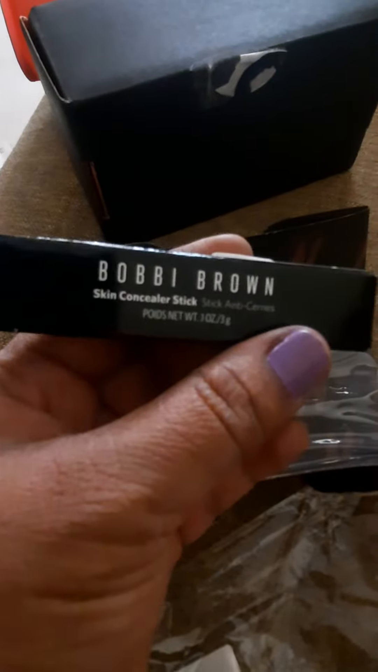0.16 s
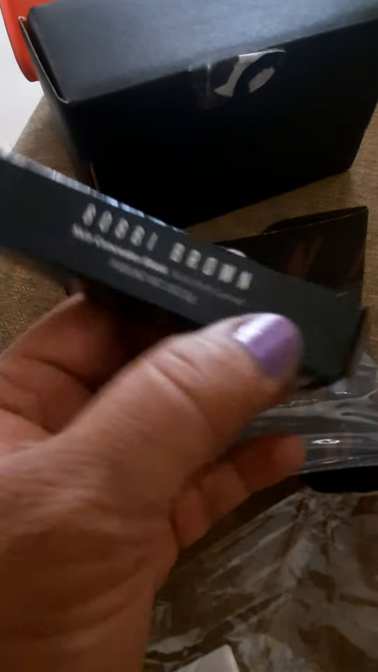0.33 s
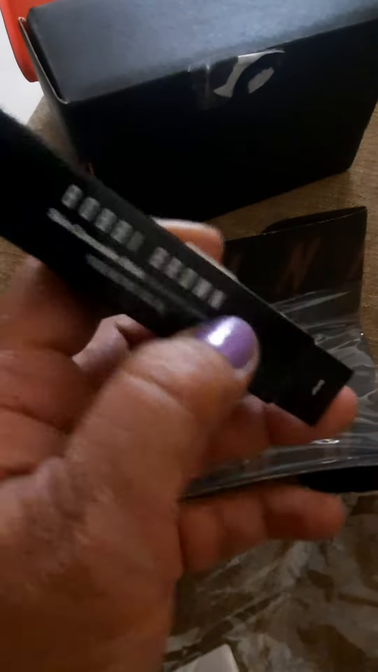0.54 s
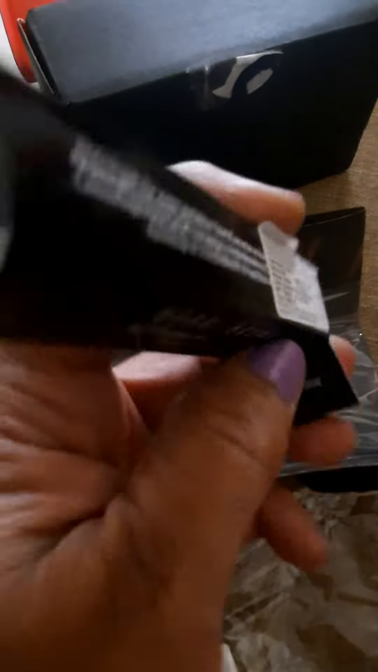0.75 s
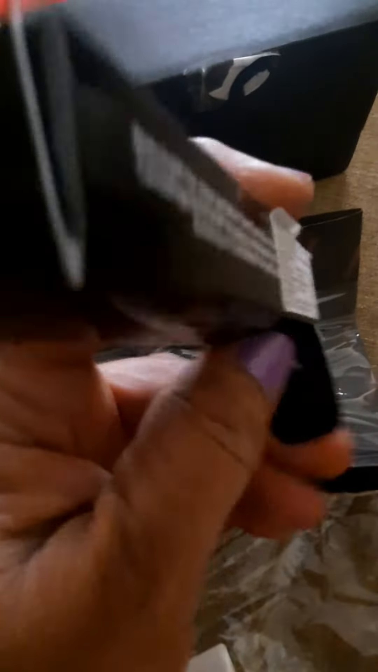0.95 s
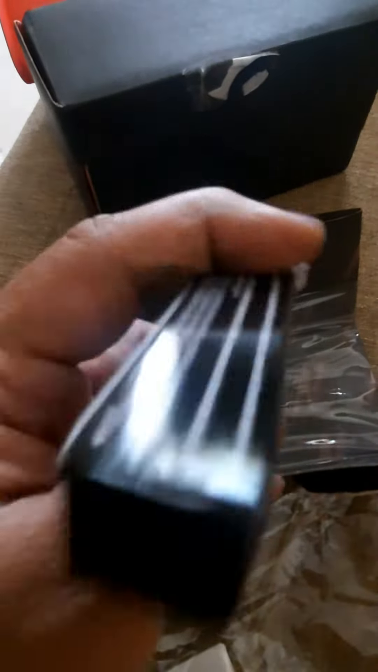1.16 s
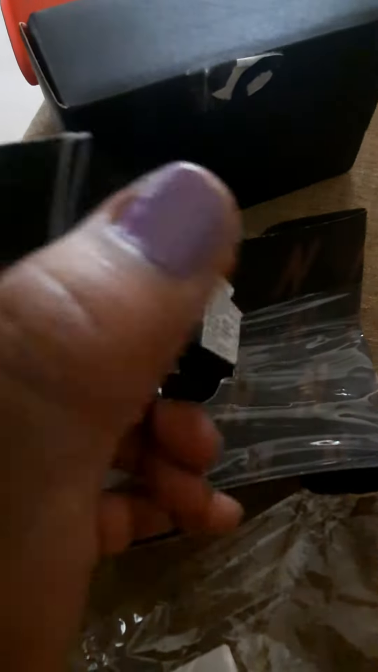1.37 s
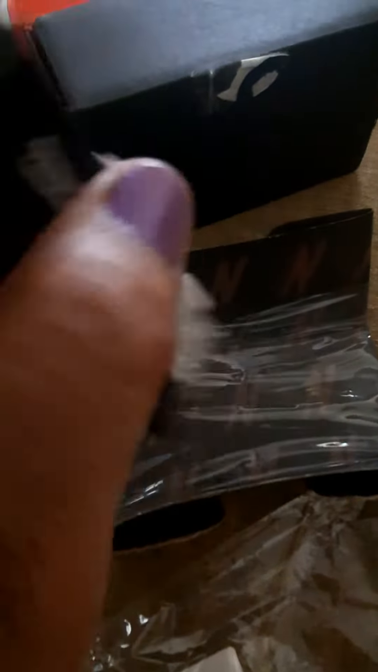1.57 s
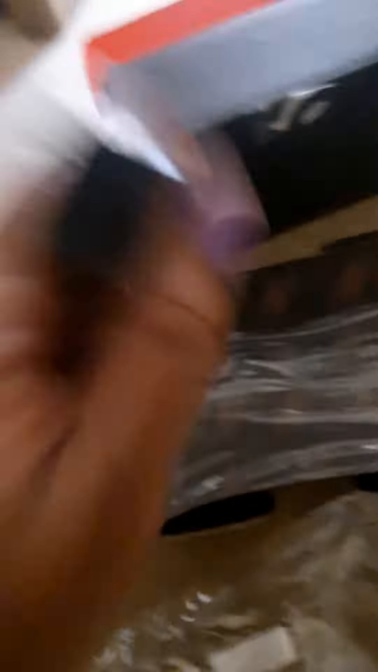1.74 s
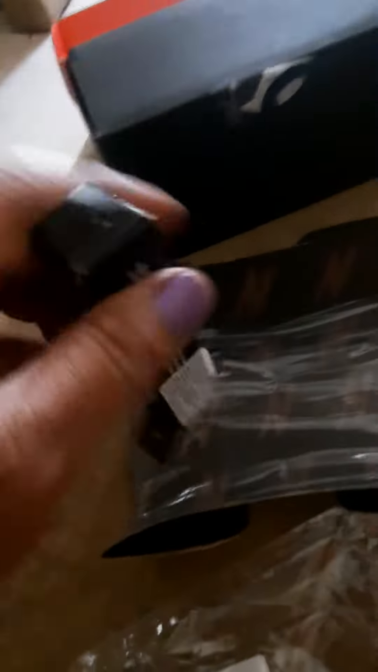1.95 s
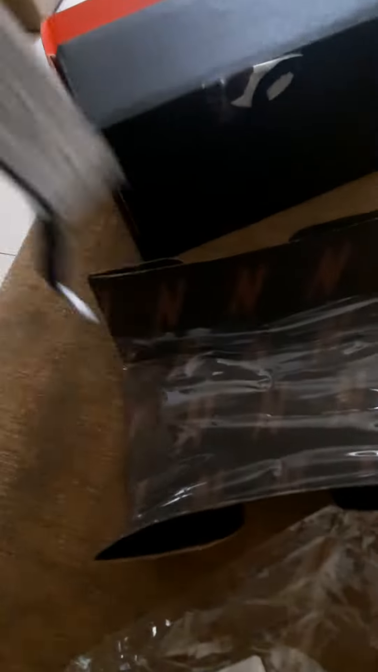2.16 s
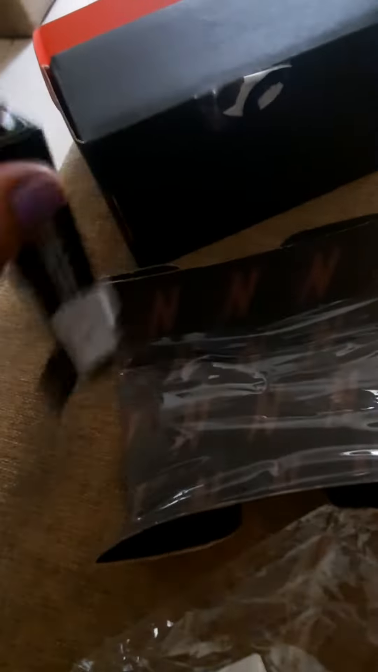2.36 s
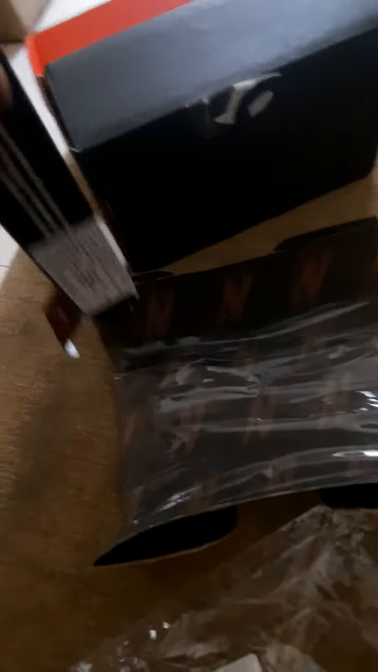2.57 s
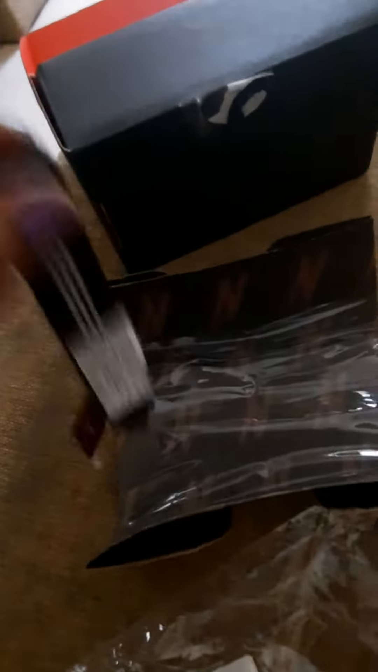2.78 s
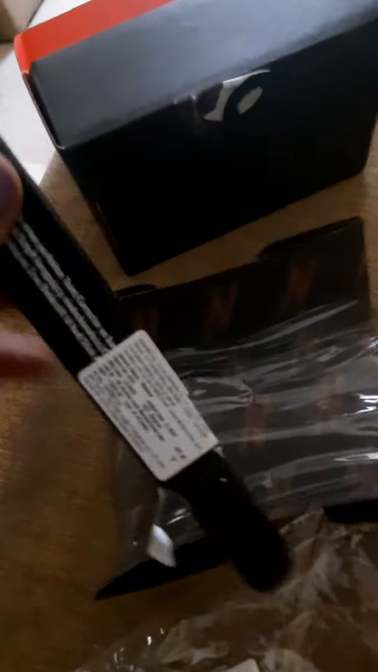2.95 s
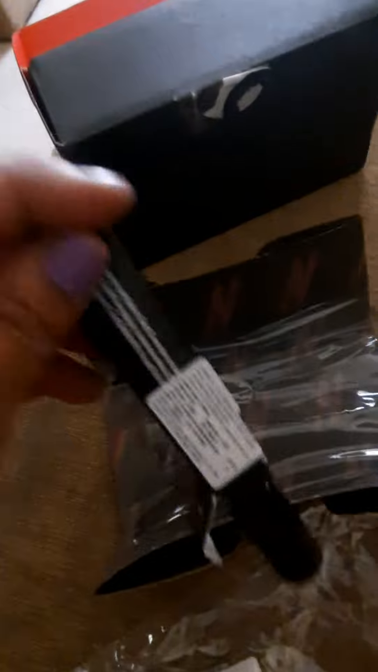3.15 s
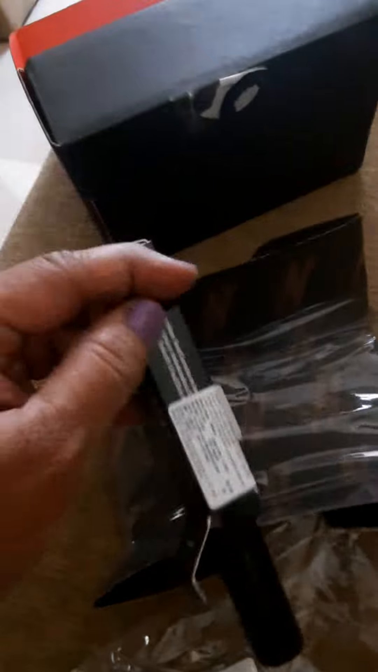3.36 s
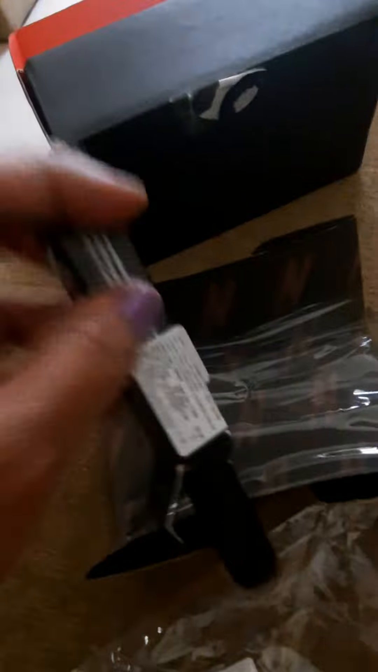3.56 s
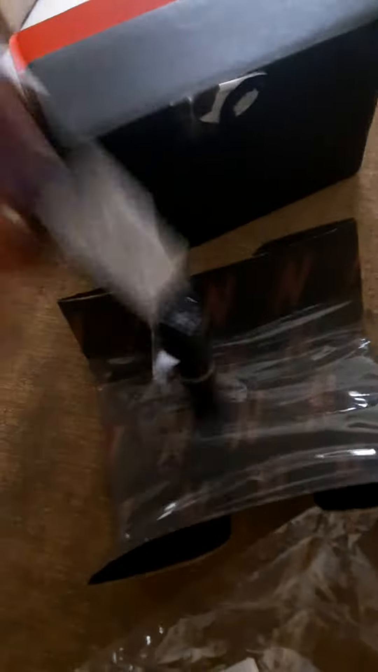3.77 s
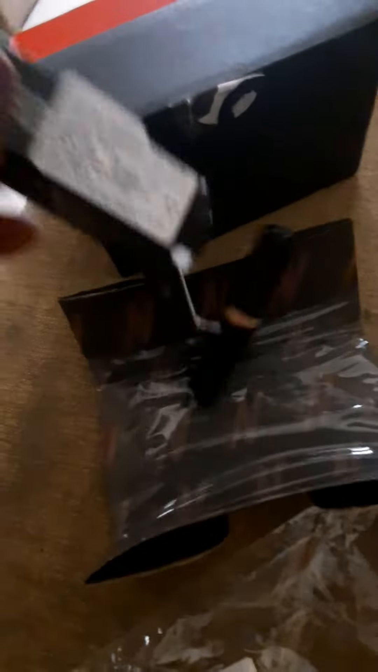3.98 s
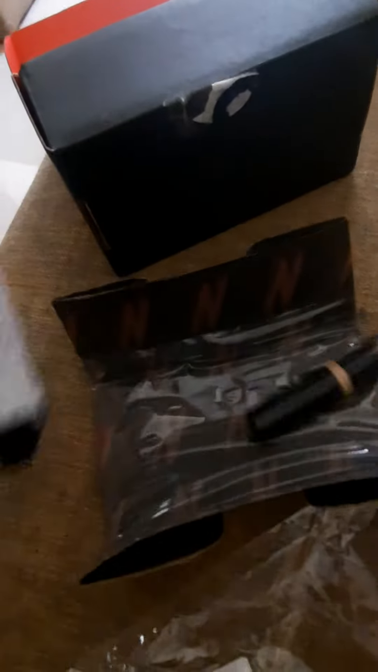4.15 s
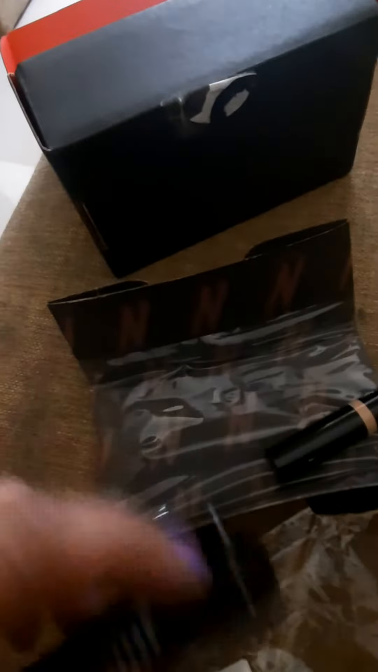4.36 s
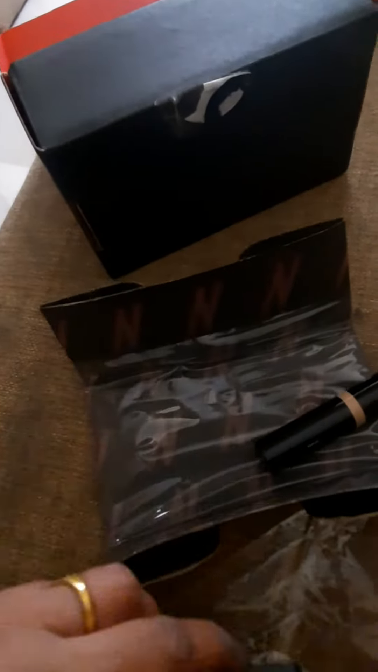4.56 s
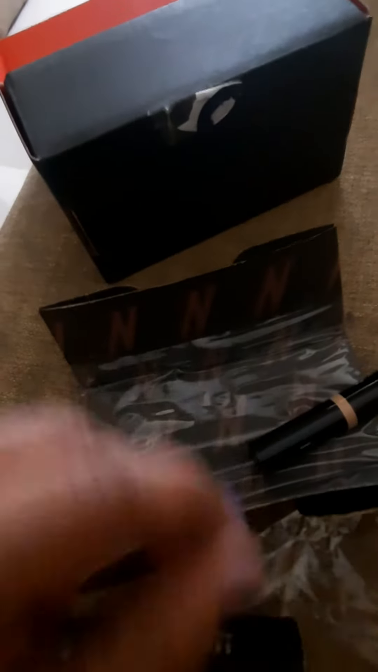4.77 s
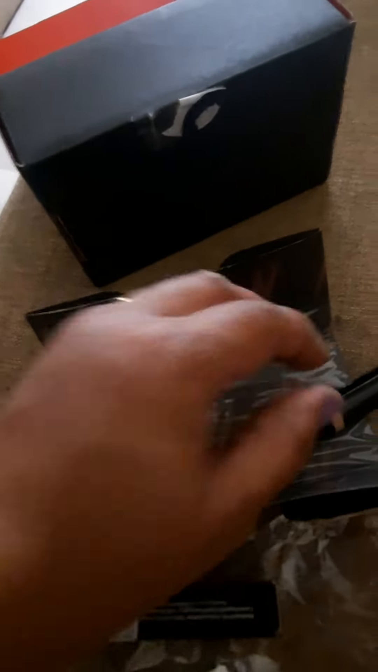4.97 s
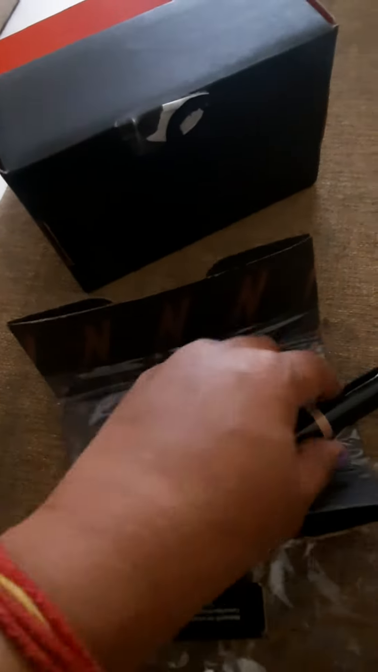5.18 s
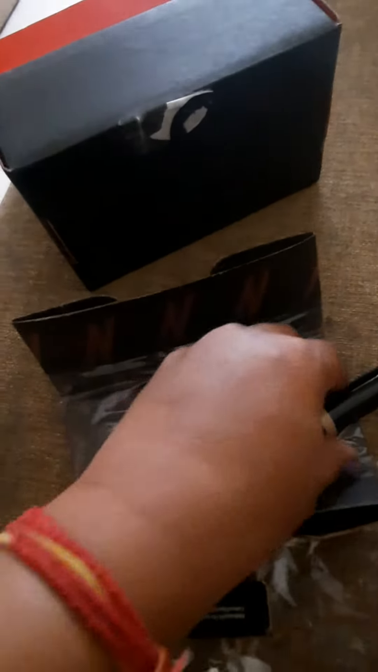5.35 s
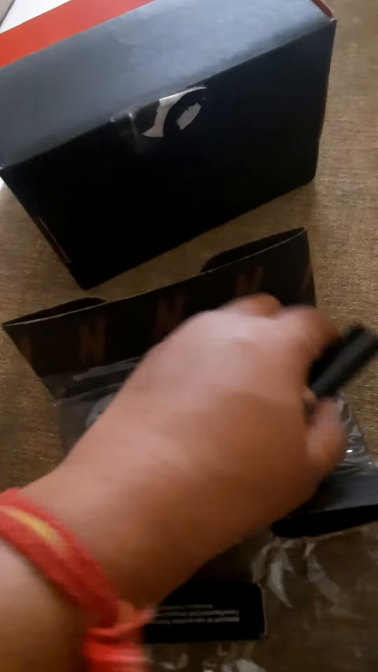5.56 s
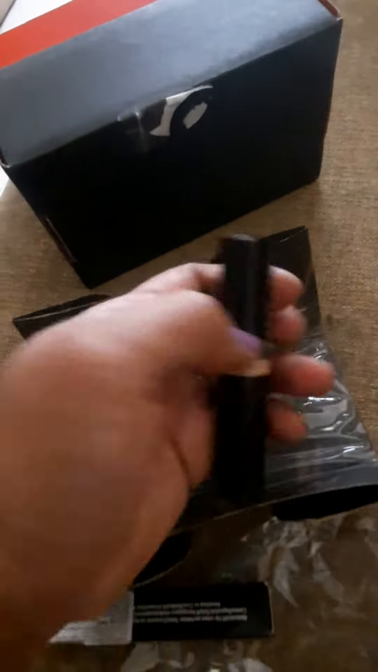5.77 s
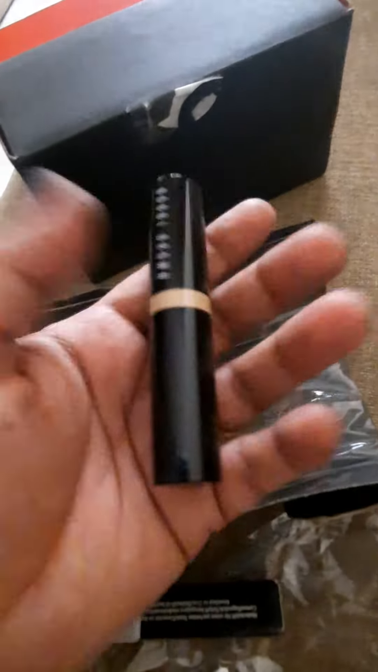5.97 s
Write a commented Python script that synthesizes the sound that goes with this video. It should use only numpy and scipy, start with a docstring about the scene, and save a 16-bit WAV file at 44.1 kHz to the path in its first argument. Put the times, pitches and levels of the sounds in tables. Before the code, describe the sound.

Close to the microphone in a small, quiet room, fingers glide faintly over a slim cardboard box, with light nail ticks from about 0.7 seconds. At 1.7 seconds the card gives a sharp snap toward the left. The end flap scrapes and pops open around 2 seconds, and more crisp snaps follow near 2.3 and 2.8 seconds. A firm hollow knock comes at about 2.85 seconds, then softer taps and faint sliding inside the carton until 3.7. At 3.8 seconds a plastic stick scrapes out and hits the table with a loud knock, bouncing again around 4 and 4.1 seconds with a sharp crackle of plastic wrapping. Light crinkles and soft rustles continue as a hand gathers it, with a short, soft drag near 5.4 seconds and last crinkles around 5.7. Quiet room air and a faint, wavering low hum lie underneath.

```python
"""Opening a cardboard carton

Close by in a small room, fingers rub a slim carton, and its end flap creaks and snaps open.
Taps and shakes make the hollow card ring until a plastic stick slides out and bounces on the table.
A hand then gathers the stick from the crinkly plastic wrapping it landed on. Snaps, knocks and
clicks are short bursts of noise that make something ring; rubs are hisses that stick and slip."""
import sys
import numpy as np
from scipy import signal
from scipy.fft import rfft, irfft
from scipy.io import wavfile

SR = 44100
rng = np.random.default_rng(int(sys.argv[2]) if len(sys.argv) > 2 else 0)


def inscribe(sig):
    """Save sig as 16-bit PCM at rate SR to the path in sys.argv[1].

    A 1-D sig is mono; a 2-D sig holds one channel per row.
    Samples are clipped to [-1, 1] before scaling.
    """
    pcm = np.round(np.clip(np.atleast_2d(sig).T, -1, 1) * 32767)
    wavfile.write(sys.argv[1], SR, pcm.astype(np.int16))


N = 265482
TIME = np.arange(N) / SR
LEAD = 256   # samples of build-up before a click peaks

# The notes the hollow carton rings with. Each row: pitch in Hz, width in Hz, gain in dB.
CARTON_RINGS = [(326, 45, 0), (1070, 55, 3), (1510, 110, 9), (1850, 110, 0.5), (5500, 350, 3.5)]
# The tone of gliding on card: the low, mid, top, bass and edge settings of tone(), in dB.
GLIDE_TONE = (-0.5, -6, 3, -0.5, -7.5)


def card_snaps():
    """Creases pop and ring the card beside them. Returns the direct sound and the room's share."""
    # Each row: time in seconds, level in dB, treble in dB, body in dB, left over right in dB,
    # ring pitch in Hz, ring gain in dB.
    creases = [(1.6926, 11, -14, -0.5, 43.5, 1862, 14.5), (1.6974, 1, 1.5, -1, 22.5, 2383, 7.5),
               (1.7124, 1.5, -3, 2, 26, 1322, 3.5), (1.7224, -5, -6.5, 0, 20.5, 1100, 2.5),
               (2.0261, -3, -0.5, -11, 8, 4400, 8), (2.035, -1.5, -14, -5, -2.5, 964, 15),
               (2.3073, 3, -3.5, 6, 8.5, 3033, 0), (2.3159, -3, 1, -3.5, 13, 2008, 8),
               (2.3718, -1.5, 5.5, -1, 3.5, 2327, 13), (2.7454, 3.5, 7.5, 3.5, 4, 2330, -1.5),
               (2.7564, 0, -7.5, -1, 1, 2870, 7.5), (2.787, 1.5, -8, 1.5, 6, 2300, 0.5),
               (3.682, -7, -1.5, -6.5, 2.5, 2280, 2), (3.738, -6, -2.5, 1.5, -4.5, 3320, 5.5)]
    # The panel's notes. Each row: multiple of the ring pitch, width as a share of pitch, gain in dB.
    panel_rings = [(1, 0.17, 2), (1.972, .05, -10), (2.621, 0.04, -5)]
    # The flap lets go: start and end in seconds.
    flap_opens = (2.029, 2.046)
    direct, to_room = np.zeros((2, 2, N))
    for s, db, treble_db, body_db, pan_db, hz, ring_db in creases:
        crumble_s = 0.0017 * from_db(-0.57 * db)   # harder snaps are shorter and cleaner
        pop = crack(crumble_s, clean_s=0.00082, alike=0.16, build=0.3)
        pop = pop + from_db(ring_db) * resonate(pop, rings_at(hz, panel_rings))
        pop_tone = tone(body_db + 4, body_db, treble_db, bass_db=0, edge_db=-5.5)
        pop = from_db(db + 0.5) * colour(pop, pop_tone)
        place(direct, pop, s - LEAD / SR, pan_db)
        # A snap close to one microphone comes with less of the room.
        place(to_room, from_db(-0.16 * abs(pan_db)) * pop, s - LEAD / SR, pan_db)
    opening = (TIME > flap_opens[0]) & (TIME < flap_opens[1])
    hollow = resonate(direct * opening, CARTON_RINGS)
    return direct + hollow, to_room + hollow


def carton_knocks():
    """The stick and the fingers knock on the hollow carton."""
    # Each row: time in seconds, level in dB, softness in dB, ring pitch in Hz, ring gain in dB,
    # loss per bounce in dB.
    hits = [(1.718, -4, 21.5, 230, 4.5, 12), (2.8506, 16, 3.5, 332, 3, 9), (2.8614, 10, 6, 323, -1, 8.5),
            (2.889, 4.5, 15.5, 315, 8, 16), (3.057, 6.5, 7.5, 367, 9.5, 9.5), (3.15, 1, 19.5, 351, 10.5, 5),
            (3.292, -0.5, 27.5, 322, -2, 16), (3.6285, 3, 15.5, 358, 5.5, 8)]
    return knocks(hits, CARTON_RINGS)


def stick_landing():
    """The stick drops and bounces on the table, which rings but gives no deep bass."""
    # Each row: time in seconds, level in dB, softness in dB, ring pitch in Hz, ring gain in dB,
    # loss per bounce in dB.
    hits = [(3.8096, 22, 17.4, 758, 8.5, 33), (3.8188, 14, 8.4, 342, 4.6, 23),
            (3.8362, 8.5, 19.5, 348, 3.7, 14), (3.8611, 7, 18.6, 345, 2, 13),
            (3.9875, 10.5, 22, 286, 7, 8.5), (4.061, -7, 22, 726, 27.4, 5.2),
            (4.1358, 6, 20.2, 623, 27.3, 13)]
    # The table's notes. Each row: pitch in Hz, width in Hz, gain in dB.
    table_rings = [(117, 59, 3.5), (322, 40, -1), (457, 29, 8), (750, 70, 12), (1372, 160, 8)]
    return cut_lows(knocks(hits, table_rings), hz=55, order=2)


def knocks(hits, body_rings):
    """Each hit and bounce rings the struck body and one hollow note. Softer hits have less treble."""
    out = np.zeros((2, N))
    for hit in hits:
        for s, db, soft_db, hz, ring_db in with_bounces(*hit):
            crumble_s = 0.0091 * from_db(-0.83 * db)   # harder hits are shorter and cleaner
            blow = crack(crumble_s, clean_s=0.002, alike=0.19, build=0.066)
            blow = colour(blow, tone(soft_db, 5.5 + 0.096 * soft_db, -5.5, bass_db=-2.5, edge_db=-12.5))
            hollow_ring = (hz, 0.18 * hz, ring_db)   # wide, so it dies within a few cycles
            blow = blow + resonate(blow, [hollow_ring] + body_rings)
            place(out, from_db(db - soft_db) * blow, s - LEAD / SR, hands_pan(s))
    return out


def with_bounces(s, db, soft_db, hz, ring_db, loss_db):
    """A hit and three bounces, each weaker and after a longer gap."""
    first_gap_s, bounce_hz, bounce_ring_db = 0.0097, 322.3, 4
    hits = [(s, db, soft_db, hz, ring_db)]
    for k in range(1, 4):
        delay_s = first_gap_s * k * (k + 1) / 2
        hits.append((s + delay_s, db - loss_db * k, soft_db, bounce_hz, bounce_ring_db))
    return hits


def card_rubs():
    """Fingers glide and card edges scrape. Both ring the wall at a pitch that shifts as they move."""
    # Fingers on card. Each row: start and end in seconds, level in dB, share of the stroke before
    # its peak, first and last ring pitch in Hz.
    glides = [(0.236, 0.467, -65.5, .6, 2100, 2700), (0.737, 0.803, -52, 0.79, 2520, 2500),
              (0.829, 0.921, -54.5, 0.079, 2270, 1950), (0.911, 1.066, -51, 0.47, 2300, 3200),
              (1.09, 1.199, -57, 0.36, 2700, 3600), (1.16, 1.404, -64, 0.9, 2230, 4400),
              (1.399, 1.561, -52, 0.47, 1968, 1600), (1.615, 1.734, -49, 0.48, 2430, 970),
              (1.951, 2.024, -53.5, 0.44, 2000, 930)]
    # Card on card, or on the stick as it slides out. The rows read the same way.
    scrapes = [(1.685, 1.722, -29.5, 0.27, 2320, 1760), (2.016, 2.046, -27, 0.65, 1013, 1370),
               (2.288, 2.304, -36.5, 0.097, 2570, 1800), (2.376, 2.416, -37, 0.5, 2500, 2200),
               (2.722, 2.744, -32.5, 0.58, 1890, 2200), (2.78, 2.814, -29, 0.35, 2280, 2000),
               (3.762, 3.788, -28, 0.65, 2280, 2600), (3.785, 3.822, -28, 0.48, 2930, 1700)]
    # The tone of a scrape: the low, mid, top, bass and edge settings of tone(), in dB.
    scrape_tone = (-0.5, -6.5, -2, -2, -12.5)
    # The wall's notes. Each row: multiple of the ring pitch, width as a share of pitch, gain in dB.
    wall_rings = [(1, 0.15, 8.5), (1.301, .11, 3), (2.35, .15, -4)]
    out = np.zeros((2, N))

    def add_strokes(strokes, stroke_tone, catches_per_s, rough_db, steepness):
        for start, end, db, peak_at, hz_from, hz_to in strokes:
            rub = friction(end - start, catches_per_s, catch_db=8, rough_db=rough_db)
            rub = swell(rub, peak_at, steepness)
            rub = rub + resonate_moving(rub, hz_from, hz_to, wall_rings)
            place(out, from_db(db) * colour(rub, tone(*stroke_tone)), start, hands_pan(start))

    add_strokes(glides, GLIDE_TONE, catches_per_s=600, rough_db=2, steepness=0.78)
    add_strokes(scrapes, scrape_tone, catches_per_s=420, rough_db=3, steepness=1)
    return out


def nail_ticks():
    """Nails and card edges tick, each spot with its own pitch."""
    # Each row: time in seconds, level in dB, ring pitch in Hz.
    touches = [(0.7395, -26, 3300), (0.843, -22, 3000), (0.8559, -25, 2280), (1.1617, -28.5, 8000),
               (1.338, -30.5, 3520), (1.459, -19.5, 6000), (1.5076, -13.5, 4940), (1.616, -22, 4610),
               (1.6436, -17, 3330), (1.657, -21, 4320), (1.7455, -11.5, 3100), (1.7708, -19, 2440),
               (1.82, -22.5, 4800), (1.9275, -29, 4500), (1.9738, -14.5, 4300), (2.561, -27.5, 3560),
               (3.7077, -16, 6700), (3.759, -18, 3020), (3.792, -11, 5130), (3.807, -20, 6040)]
    out = np.zeros((2, N))
    for s, db, hz in touches:
        click = tick(hz, crumble_s=0.0032, width_share=0.35, ring_db=14.5)
        place(out, from_db(db) * click, s - LEAD / SR, hands_pan(s))
    return out


def wrapping_crinkles(longest_wait_s=0.0077, next_fold_db=-14):
    """A fold of the wrapping buckles with a sharp click, and its neighbour follows more weakly."""
    # Each row: time in seconds, level in dB, ring pitch in Hz.
    folds = [(4.1359, 2.5, 5540), (4.163, -7, 6630), (4.2102, -10, 5540), (4.256, -14.5, 5160),
             (4.6487, -17.5, 4140), (4.6626, -18, 4200), (4.6704, -14, 4500), (4.687, -19.5, 6300),
             (4.705, -16, 6940), (4.7208, -19, 8100), (4.7828, -16, 6900), (4.9094, -12.5, 6270),
             (4.918, -19.5, 12000), (4.947, -18.5, 12600), (4.9733, -21.5, 12900), (5.1267, -20, 7170),
             (5.149, -17.5, 7100), (5.45, -16.5, 5860), (5.6431, -10, 8200), (5.6584, -16.5, 6450)]
    out = np.zeros((2, N))
    for s, db, hz in folds:
        next_s = s + longest_wait_s * rng.uniform(0.37, 1)
        for at, level_db in [(s, db), (next_s, db + next_fold_db)]:
            click = tick(hz, crumble_s=0.0006, width_share=0.46, ring_db=5)
            place(out, from_db(level_db) * click, at - LEAD / SR, hands_pan(s))
    return out


def wrapping_rustles():
    """The wrapping rustles under stick and hand. More weight brings in the low sound of the table."""
    # Each row: start and end in seconds, level in dB, weight as a bass boost in dB, share of the
    # press before its peak.
    presses = [(3.965, 4.056, -47.5, 10, 0.13), (4.057, 4.199, -43.5, 13.5, 0.29),
               (4.169, 4.35, -53.5, 11, 0.19), (4.641, 4.777, -47, 7, 0.18), (4.861, 5.012, -55, 11, 0.3),
               (5.1, 5.318, -51.5, 9.5, 0.22), (5.518, 5.799, -57.5, 14.5, 0.4)]
    out = np.zeros((2, N))
    for start, end, db, weight_db, peak_at in presses:
        rustle = friction(end - start, catches_per_s=300, catch_db=14, rough_db=4)
        rustle = swell(rustle, peak_at, steepness=0.86)
        rustle = colour(rustle, tone(weight_db, 0.58 * weight_db, 3, bass_db=6.5, edge_db=-16))
        place(out, from_db(db) * rustle, start, hands_pan(start))
    return out


def stick_drag():
    """The hand drags stick and wrapping over the table: a round scrape that swells and sinks."""
    # How loud the drag is. Each row: time in seconds, level in dB.
    loudness = [(5.241, -94), (5.31, -57), (5.355, -49), (5.42, -42), (5.459, -47), (5.5, -68),
                (5.551, -68)]
    # The table's notes under the stick. Each row: pitch in Hz, width in Hz, gain in dB.
    table_rings = [(277, 63, 22.5), (353, 58, 20), (1120, 1050, 3.5)]
    # The tone of the drag. Each row: frequency in Hz, gain in dB.
    drag_tone = [(100, 11), (350, -4), (1050, 1), (2700, -6), (4300, 3), (8500, 2.5), (16000, -10.5)]
    out = np.zeros((2, N))
    times, levels_db = np.transpose(loudness)
    start, end = times[0], times[-1]
    scrape = friction(end - start, catches_per_s=220, catch_db=-4, rough_db=2.5)
    t = start + np.arange(scrape.shape[1]) / SR
    scrape = scrape * from_db(np.interp(t, times, levels_db))
    scrape = scrape + resonate(scrape, table_rings)
    place(out, colour(scrape, drag_tone), start, hands_pan(start))
    return out


def stick_slides():
    """The stick slips along inside the open carton, which rings like a short tube."""
    # Each row: start and end in seconds, level in dB, share of the slide before its peak.
    slides = [(2.938, 3.035, -56, 0.81), (3.167, 3.337, -61, 0.48), (3.406, 3.654, -62, 0.62)]
    # The tube's notes. Each row: pitch in Hz, width in Hz, gain in dB.
    tube_rings = [(380, 200, 18), (1101, 300, 18.5), (2680, 550, 9.5), (5800, 2100, 3.5)]
    out = np.zeros((2, N))
    for start, end, db, peak_at in slides:
        slip = friction(end - start, catches_per_s=90, catch_db=8.5, rough_db=3.5)
        slip = swell(slip, peak_at, steepness=1.9)
        slip = slip + resonate(slip, tube_rings)
        place(out, from_db(db) * colour(slip, tone(*GLIDE_TONE)), start, hands_pan(start))
    return out


def settling_ticks(per_s=7, middle_hz=5500, loudest_db=-30, spread_db=11):
    """Card and wrapping settle with faint ticks at random moments."""
    out = np.zeros((2, N))
    for when, faintness, pitch in rng.random((int(per_s * N / SR), 3)):
        s = when * N / SR
        click = tick(middle_hz * 2 ** (pitch - 0.5), crumble_s=0.0006, width_share=0.46, ring_db=8)
        place(out, from_db(loudest_db - spread_db * faintness) * click, s, hands_pan(s))
    return out


def low_hum(hz=74, waver_radians=0.38, overtone_db=-12, bump_db=4.5):
    """A low, wavering hum comes in bumps while the hands move."""
    # How loud the hum is. Each row: time in seconds, level in dB.
    loudness = [(0, -68), (1.33, -75.5), (1.45, -52.5), (2.06, -49), (2.12, -61), (3.6, -70.5), (6.02, -65)]
    slow_noise = resonate(rng.standard_normal((2, N)), [(8, 4.8, 0)])   # about 8 sways a second
    waver, bumps = unit_level(slow_noise)
    phase = 2 * np.pi * hz * TIME + waver_radians * waver
    hum = np.sin(phase) + from_db(overtone_db) * np.sin(2 * phase)
    hum = unit_level(hum * from_db(bump_db * bumps))
    return from_db(np.interp(TIME, *np.transpose(loudness))) * hum


def room_air(fade_s=0.014):
    """The quiet noise of a still room, with faint narrow hisses that come and go."""
    # The tone of the air. Each row: frequency in Hz, gain in dB.
    air_tone = [(25, -15.5), (50, -22), (80, -5), (130, -1.5), (230, -9), (330, -0.5), (450, -12),
                (620, -21), (1500, -25.5), (3000, -29), (6000, -35.5), (9500, -36.5), (15000, -40)]
    # Each row: start and end in seconds, pitch in Hz, width in Hz, level in dB.
    hisses = [(0, 1.42, 3340, 188, -73), (0.278, 1.393, 790, 57.5, -78.5), (4.257, 4.682, 1090, 1800, -65),
              (5.57, 6.02, 1650, 395.5, -70.5)]
    out = from_db(-43) * colour(stereo_noise(N, alike=0.09), air_tone)
    for start, end, hz, width, db in hisses:
        fade = np.interp(TIME, [start - fade_s, start, end, end + fade_s], [0, 1, 1, 0])
        band = [(hz, width, 0)]
        hiss = resonate(resonate(stereo_noise(N, alike=0.027), band), band)
        out = out + from_db(db) * fade * unit_level(hiss)
    return out


def room_echo(x, early_db=-20.5, early_fade_s=0.015, first_echo_s=0.0056, build_s=0.0009):
    """Quick echoes come off the table and boxes, then a smooth tail whose treble dies first."""
    # How long the tail lasts. Each row: frequency in Hz, seconds to fade by 60 dB.
    fade_times = [(100, 0.35), (1000, 0.28), (3000, 0.27), (8000, 0.23), (16000, 0.18)]
    # How strong the tail is. Each row: frequency in Hz, gain in dB.
    tail_levels = [(100, -6), (350, -13.5), (1000, -9.5), (3000, -15), (16000, -12.5)]
    t = np.arange(int(0.7 * SR)) / SR
    edges_hz = np.geomspace(60, 17000, 11)
    echo = 0
    for low, high in zip(edges_hz, edges_hz[1:]):
        hz = np.sqrt(low * high)
        noise = stereo_noise(len(t), alike=1 / (1 + (hz / 700) ** 2))
        band = signal.sosfilt(signal.butter(2, [low, high], "band", fs=SR, output="sos"), noise)
        fade = from_db(-60 * t / at_hz(fade_times, hz)) * (1 - np.exp(-t / build_s))
        echo = echo + from_db(at_hz(tail_levels, hz)) * band * fade / np.linalg.norm(fade)
    early = np.exp(-t / early_fade_s) * (t > first_echo_s)
    echo = echo + from_db(early_db) * stereo_noise(len(t), alike=0.79) * early / np.linalg.norm(early)
    mixed = 0.93 * x + 0.21 * x[::-1]   # echoes mix left and right
    return signal.fftconvolve(mixed, echo, axes=-1)[:, :N]


def crack(crumble_s, clean_s, alike, build, size=4096):
    """Fibres give way around one clean pulse. Crumbling for longer than clean_s drowns the pulse."""
    crumble_s = max(crumble_s, 1 / SR)
    age = (np.arange(size) - LEAD) / SR / crumble_s
    burst = stereo_noise(size, alike) * np.exp(-np.maximum(age, -age / build))
    pulse_share = 1 / (1 + (crumble_s / clean_s) ** 2)
    burst *= np.sqrt((1 - pulse_share) / np.sum(burst ** 2, axis=1, keepdims=True))
    burst[:, LEAD] += np.sqrt(pulse_share) * rng.choice([-1, 1])
    return burst


def tick(hz, crumble_s, width_share, ring_db):
    """A tiny bright click with one ringing note and hardly any bass."""
    pulse = crack(crumble_s, clean_s=crumble_s / 2, alike=0.21, build=0.27)
    return cut_lows(pulse, hz / 2, order=1) + resonate(pulse, [(hz, hz * width_share, ring_db)])


def friction(length_s, catches_per_s, catch_db, rough_db, spread_db=1.5, slip_s=0.004):
    """A hiss that sticks and slips, with tiny ticks where an edge catches."""
    t = np.arange(0, max(length_s, slip_s), 1 / SR)
    slip_times = np.arange(0, t[-1] + slip_s, slip_s)
    grip = from_db(rough_db * np.interp(t, slip_times, rng.standard_normal(len(slip_times))))
    sizes = from_db(catch_db + spread_db * np.minimum(rng.exponential(1, len(t)), 3))
    signs = rng.choice([-1, 1], len(t))
    catches = sizes * signs * (rng.random(len(t)) < catches_per_s / SR)
    return grip * (stereo_noise(len(t), alike=0.23) + catches)


def swell(x, peak_at, steepness):
    """Pressure rises smoothly to a peak part-way through a stroke, then lets go."""
    rise = np.interp(np.linspace(0, 1, x.shape[1]), [0, np.clip(peak_at, 0.05, 0.95), 1], [0, 1, 0])
    return x * np.sin(np.pi / 2 * rise) ** steepness


def ring_filter(hz, width, db):
    """The gain and feedback of one ringing note. A wider note dies sooner."""
    r = np.exp(-np.pi * width / SR)
    return from_db(db) * (1 - r * r) / 2, [1, -2 * r * np.cos(2 * np.pi * hz / SR), r * r]


def resonate(x, rings):
    """Let a sound ring several notes at once."""
    out = 0
    for ring in rings:
        gain, feedback = ring_filter(*ring)
        out = out + gain * signal.lfilter([1, 0, -1], feedback, x + 1e-18)
    return out


def resonate_moving(x, hz_from, hz_to, shape, step=128):
    """A panel's notes glide as the touch travels along it."""
    out = np.zeros_like(x)
    memory = np.zeros((len(shape), 2, 2))
    for at in range(0, x.shape[1], step):
        hz = hz_from + (hz_to - hz_from) * at / x.shape[1]
        for k, ring in enumerate(rings_at(hz, shape)):
            gain, feedback = ring_filter(*ring)
            part, memory[k] = signal.lfilter([1, 0, -1], feedback, x[:, at:at + step], zi=memory[k])
            out[:, at:at + step] += gain * part
    return out


def rings_at(hz, shape):
    """The notes of a panel whose lowest one is at hz."""
    return [(min(hz * multiple, 0.4 * SR), hz * multiple * share, db) for multiple, share, db in shape]


def tone(low_db, mid_db, top_db, bass_db, edge_db):
    """A tone curve of (Hz, dB) points, with 3000 Hz held at 0 dB."""
    return [(100, low_db + bass_db), (350, low_db), (1050, mid_db),
            (3000, 0), (8500, top_db), (16000, top_db + edge_db)]


def colour(x, points, size=4096):
    """Shape a sound with a tone curve, so that nothing rings ahead of it (minimum phase)."""
    gains = from_db(at_hz(points, np.fft.rfftfreq(size, 1 / SR)))
    cepstrum = irfft(np.log(gains))
    cepstrum[1:size // 2] *= 2
    cepstrum[size // 2 + 1:] = 0
    response = irfft(np.exp(rfft(cepstrum)))
    return signal.fftconvolve(x, response[None], axes=-1)[:, :x.shape[-1]]


def cut_lows(x, hz, order):
    """Turn down everything below hz."""
    return signal.sosfilt(signal.butter(order, hz, "high", fs=SR, output="sos"), x)


def hands_pan(s):
    """How far to the left the hands sound at a given second, in dB."""
    # The path of the hands. Each row: time in seconds, left over right in dB.
    path = [(0, 0.5), (1.65, 3), (2.0, -3), (2.3, 8), (2.75, -3.5), (2.87, 2.5), (3.15, -7), (3.63, -2.5),
            (3.8, 0.5), (4.2, -1), (4.8, -9), (5.2, -2.5)]
    return np.interp(s, *np.transpose(path))


def place(out, sound, s, pan_db):
    """Add a sound at second s. The nearer microphone gets it louder and a little sooner."""
    gains = unit_level(from_db([pan_db / 2, -pan_db / 2]))
    lag_samples = np.clip(3.5 * pan_db, -13, 13)
    for side, late in enumerate([max(-lag_samples, 0), max(lag_samples, 0)]):
        at = max(int(s * SR + late), 0)
        part = sound[side, :max(N - at, 0)]
        out[side, at:at + len(part)] += gains[side] * part


def stereo_noise(count, alike):
    """White noise; alike, from 0 to 1, is how much left and right share."""
    shared = np.sqrt(alike) * rng.standard_normal(count)
    return shared + np.sqrt(1 - alike) * rng.standard_normal((2, count))


def at_hz(points, hz):
    """Read a curve between its points, with octaves evenly spaced."""
    freqs, values = np.transpose(points)
    return np.interp(np.log(np.maximum(hz, 1)), np.log(freqs), values)


def from_db(db):
    return 10 ** (np.asarray(db) / 20)


def unit_level(x):
    return x / np.sqrt(np.mean(x ** 2) + 1e-20)


def scene(background_pan_db=-3.5):
    """Carton, stick and wrapping with their echo, over a quiet hum and room air."""
    # The microphone's tone. Each row: frequency in Hz, gain in dB.
    mic_tone = [(30, -22.5), (80, -1.5), (150, -1.5), (210, -6), (300, 3), (560, -2), (1050, 0), (1700, -5),
                (2400, 0), (4300, -3.5), (5800, -3.5), (9600, -7), (12500, -1), (16000, -10.5)]
    snaps, snaps_to_room = card_snaps()
    ticks = nail_ticks() + settling_ticks()
    crinkles = wrapping_crinkles()
    handling = stick_landing() + carton_knocks()
    handling += card_rubs() + stick_slides() + stick_drag() + wrapping_rustles()
    # Ticks and crinkles are close to the microphone, so they come with less echo.
    echo = room_echo(handling + snaps_to_room + from_db(-0.5) * ticks + from_db(-2) * crinkles)
    background = (low_hum() + room_air()) * from_db([[background_pan_db / 2], [-background_pan_db / 2]])
    return colour(handling + ticks + crinkles + snaps + echo, mic_tone) + background


def record(dry):
    """Round off the tallest peaks and steeply cut the highest treble."""
    ceiling, cutoff_hz = 0.9, 16300
    rounded = dry / (1 + (dry / ceiling) ** 4) ** 0.25
    return signal.sosfilt(signal.ellip(10, 0.1, 80, cutoff_hz, fs=SR, output="sos"), rounded)


dry = scene()
out = record(dry)
inscribe(out)
```